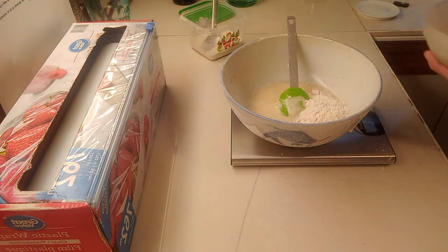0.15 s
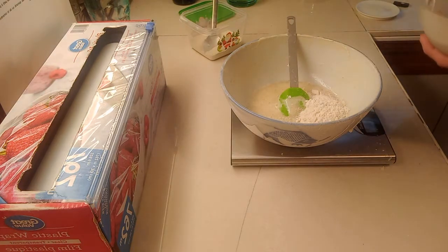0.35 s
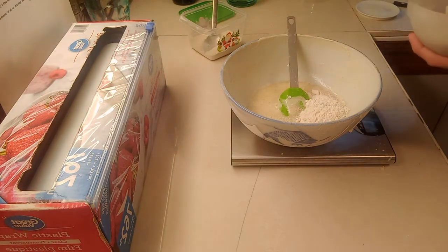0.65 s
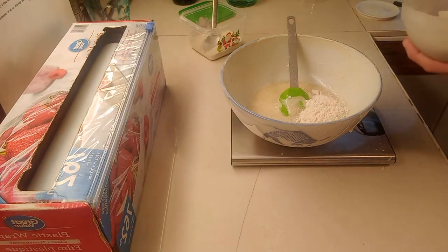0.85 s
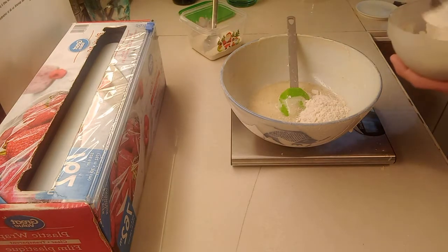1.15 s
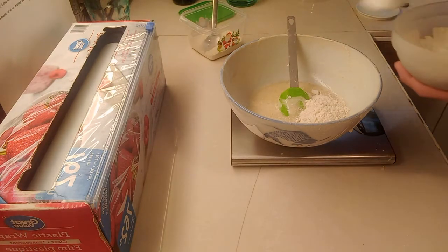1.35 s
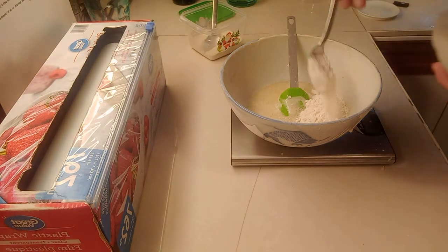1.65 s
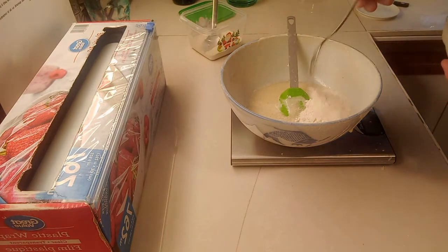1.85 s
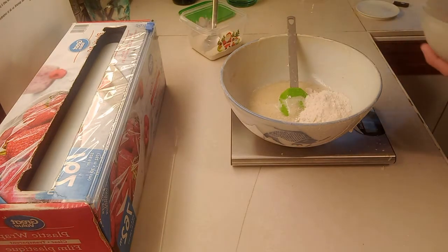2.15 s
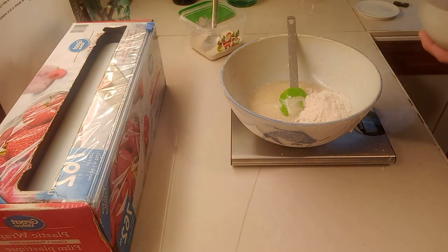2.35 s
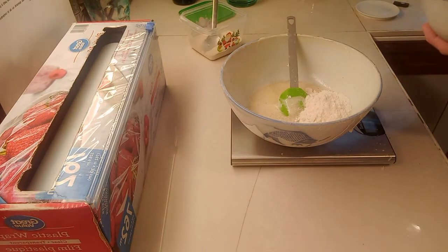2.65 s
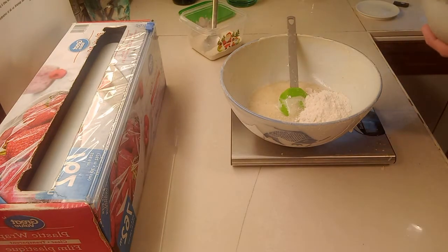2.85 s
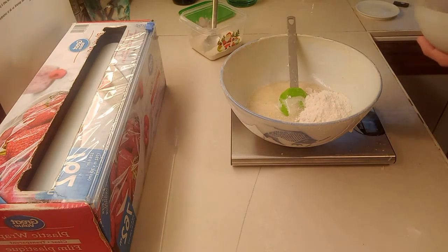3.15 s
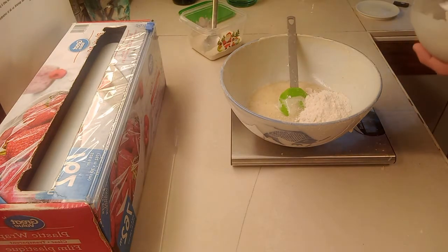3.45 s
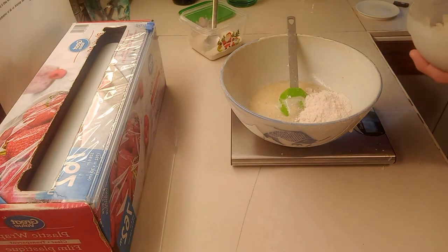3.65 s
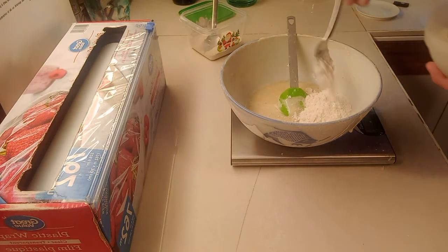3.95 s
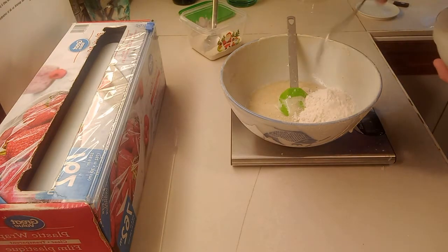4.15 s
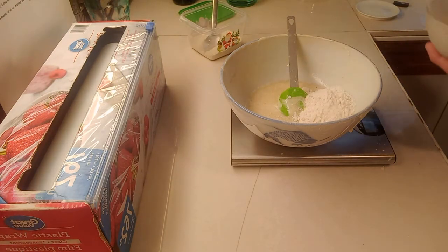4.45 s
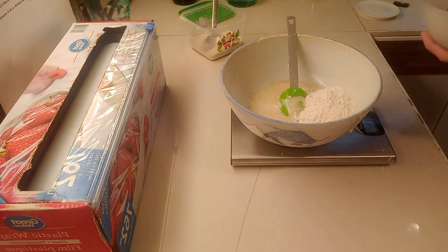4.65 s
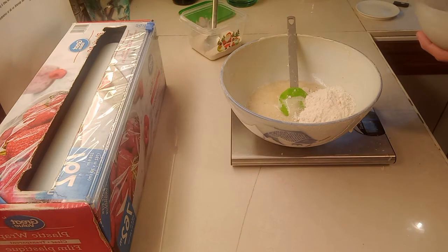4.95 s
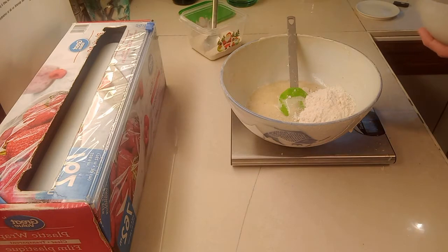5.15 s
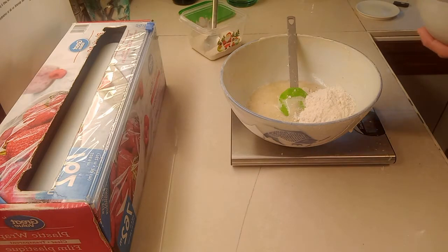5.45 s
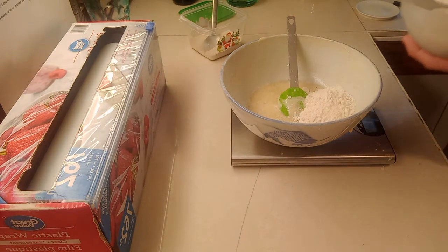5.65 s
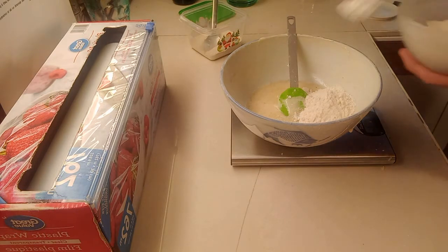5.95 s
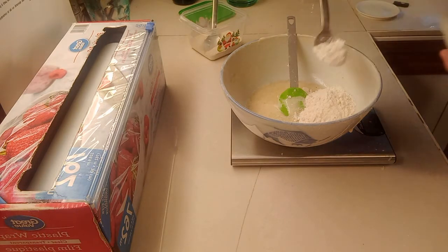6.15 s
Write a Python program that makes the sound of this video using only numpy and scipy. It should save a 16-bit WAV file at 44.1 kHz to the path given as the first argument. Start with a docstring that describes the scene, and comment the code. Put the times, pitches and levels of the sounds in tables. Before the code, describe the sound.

Heard fairly close in stereo, slightly to the right: a spoon scooping flour from a bowl in a small kitchen. First a bright ringing clink and a gritty crunch, then a quick double crunch followed by two hard knocks, and finally delicate ticks and a soft, dry scrape. Quiet low rumble and faint steady appliance tones fill the gaps.

```python
"""A metal spoon scoops flour three times from a hand-held bowl in a quiet kitchen.
Throughout, shaped noise gives a low rumble with one swell, faint hiss and narrow appliance tones.
Decaying rim modes make one bright clink near the start, with two far fainter touches later.
Random slips through resonances crunch in two deep scoops, then whisper in a last, lighter sweep.
Filtered clicks give ticks, thuds and knocks along the way, and dense reflections answer briefly."""
import sys
import numpy as np
from scipy import signal
from scipy.fft import rfft, irfft
from scipy.io import wavfile

SR = 44100
rng = np.random.default_rng(int(sys.argv[2]) if len(sys.argv) > 2 else 0)


def store_wav(level_fs):
    """Save 16-bit WAV to argv[1]."""
    pcm = np.round(np.clip(np.atleast_2d(level_fs), -1, 1) * 32767)
    wavfile.write(sys.argv[1], SR, pcm.T.astype(np.int16))


N = 278214  # length in samples
SIZE = 8192  # samples in a filter or a burst
HZ = np.fft.rfftfreq(SIZE, 1 / SR)


def amp(db):
    """Decibels to amplitude gain: twenty decibels are a factor of ten."""
    return 10 ** (np.asarray(db) / 20)


def unit(x):
    """Normalises the mean power, giving rms 1."""
    return x / np.sqrt(np.mean(x ** 2) + 1e-30)


def read(points, hz):
    """Interpolates a table linearly over the logarithm of frequency."""
    f, value = np.transpose(points)
    return np.interp(np.log(hz + 1), np.log(f + 1), value)


def add(mix, s, sound):
    """Superposition: adds a sound to the mix from time s in seconds."""
    part = mix[..., max(round(s * SR), 0):][..., :sound.shape[-1]]
    part += sound[..., :part.shape[-1]]


def humps(rows, hz):
    """Power sum of steep-sided resonances; each is 14 dB down one width from its centre."""
    power = 0
    for f, width, db in rows:
        gain = amp(db) / (1 + 0.72 * ((hz - f) / width) ** 2) ** 3
        power = power + gain ** 2
    return np.sqrt(power)


def colour(x, gain):
    """Minimum-phase filter: the Hilbert transform of the log gain on HZ supplies a causal phase."""
    both_halves = np.r_[gain, gain[-2:0:-1]]
    log_gain = np.log(np.maximum(both_halves / gain.max(), 1e-5))
    response = np.fft.ifft(np.exp(np.conj(signal.hilbert(log_gain)))).real
    return signal.fftconvolve(x, response)


def hiss(gain):
    """Random-phase noise: a fixed magnitude spectrum with uniformly random phases, at rms 1."""
    phases = np.exp(2j * np.pi * rng.random(len(gain)))
    return unit(irfft(gain * phases))


def contact(hz, bright_hz):
    """Contact softness as a second-order low-pass magnitude: a cushioned touch drives less treble."""
    return 1 / np.sqrt(1 + (hz / bright_hz) ** 4)


def reflections(x):
    """Diffuse reverberation: dense random reflections, different on each side, decay band by band."""
    # Each row: frequency in Hz, t60 in seconds
    decay_times = [(100, .3), (800, .25), (2300, 0.24), (5500, 0.18), (9000, .24), (15000, .25)]
    count = 1000  # time slots, the first six left empty
    taps = np.zeros((2, SR // 2))
    step = taps.shape[1] // count
    at = np.arange(6, count) * step + rng.integers(0, step, (2, count - 6))
    np.put_along_axis(taps, at, rng.choice([-1., 1.], at.shape), 1)
    hz, t, z = signal.stft(taps, SR, nperseg=256)
    fade = amp(-60 * t / read(decay_times, hz)[:, None])
    tail = signal.istft(z * fade, SR)[1]
    tail = tail / np.linalg.norm(tail[0])
    return signal.oaconvolve(x * np.ones((2, 1)), tail, axes=1)[:, :N]


def kitchen(x, wet_db, pan_db):
    """Localisation by time and level: direct sound reaches the right side first, then the room answers."""
    left_lag = 8  # samples
    sides = np.array([np.roll(x, left_lag), x])
    direct = sides * unit(amp([[pan_db], [0]]))
    return direct + amp(wet_db) * reflections(x)


def rumble_level():
    """Exponential envelope in decibels: a steady gain but for one swell that settles slowly."""
    steady_db, swell_db = -68, 7.5
    peak_s, rise_s, fall_s = 0.55, .45, 0.76
    t = np.arange(N) / SR - peak_s
    swell = np.exp(-np.maximum(-t / rise_s, t / fall_s))
    return amp(steady_db + swell_db * swell)


def appliance_tones(hz):
    """Narrow-band noise: random-phase bands sound as steady hum, whine and hiss."""
    # Each row: centre in Hz, width in Hz, rms level in dB
    bands = [(93, 4, -78.5), (393, 8, -87), (4756, 35, -88), (5080, 400, -95), (7600, 980, -95.5),
             (10030, 180, -100)]
    return sum(amp(db) * hiss(humps([(f, width, 0)], hz)) for f, width, db in bands)


def background(air_db):
    """Partial coherence: shared and independent noise form a rumble and faint hiss, under tones."""
    # Noise spectrum. Each row: frequency in Hz, relative level in dB per Hz
    air_spectrum = [(20, -45), (45, -14), (70, -0.5), (100, -2.5), (170, -9.5), (240, -13.5), (410, -9),
                    (520, -17.5), (800, -26), (1400, -36), (3500, -41.5), (5800, -43.5), (7500, -43.5),
                    (9000, -43), (15800, -45)]
    # Likeness of the two sides. Each row: frequency in Hz, left-right correlation from 0 to 1
    likeness = [(50, 0.5), (130, 0.95), (300, 0.3), (650, .35), (1400, 0), (16000, 0.06)]
    hz = np.fft.rfftfreq(N, 1 / SR)
    gain = amp(read(air_spectrum, hz))
    same = np.clip(read(likeness, hz), 0, 1)
    left, other = rfft(hiss(gain)), rfft(hiss(gain))
    right = same * left + np.sqrt(1 - same ** 2) * other
    both = np.array([left, right])
    low = contact(hz, 900)  # here a crossover between rumble and hiss
    rumble = irfft(both * low) * rumble_level() * amp([[-.7], [.7]])
    air = amp(air_db) * irfft(both * (1 - low))
    tones = np.array([appliance_tones(hz) for side in range(2)])
    return rumble + air + tones


def rattle(t60):
    """Spectral flattening: a dying burst of micro-contacts holds all frequencies evenly, with energy 1."""
    fade = amp(-60 * np.arange(SIZE) / SR / t60)
    burst = rng.standard_normal(SIZE) * fade
    # flattening smears the burst in time, so it alternates with fading
    for _ in range(3):
        flat = irfft(np.exp(1j * np.angle(rfft(burst))))
        burst = flat * np.sqrt(fade)
    return burst / np.linalg.norm(burst)


def blows(rows, body, chatter):
    """Source and filter: a sharp click and a dying chatter of the spoon excite a resonant body."""
    out = np.zeros(N)
    for s, db, bright_hz, t60 in rows:
        force = chatter * rattle(t60)
        force[0] += 1
        sound = colour(force, body * contact(HZ, bright_hz))
        add(out, s, amp(db) * sound / np.std(sound[:SR // 100]))  # level set over the first 10 ms
    return out


def ticks():
    """Impulse excitation: light touches of the spoon's tip are brief and rich in treble."""
    # Each row: start in seconds, level in dB before the room, brightness in Hz, chatter t60 in seconds
    touches = [(0.049, -65.5, 11900, 0.012), (2.833, -71.5, 14000, 0.069), (2.9142, -56, 11000, 0.043),
               (4.7195, -63.5, 22000, 0.03), (4.768, -68, 17000, 0.016), (4.809, -66.5, 15100, 0.035)]
    # Each row: frequency in Hz, relative level in dB
    spectrum = [(20, -38), (200, 9), (1100, -2), (1900, -11.5), (4100, -2.5), (5000, -12), (7200, -1),
                (8500, -8.5), (12000, -5.5), (15800, -2)]
    return blows(touches, amp(read(spectrum, HZ)), chatter=1.6)


def rim(clash_db, clash_t60, spoon_db, spoon_t60):
    """Modal superposition: close rim modes start in step and beat, under the spoon's clash and ring."""
    # Rim modes in beating clusters. Each row: frequency in Hz, relative level in dB,
    # t60 in seconds, left-right level difference in dB
    modes = [(888, -37, .21, 0), (907, -32, .23, 0), (2230, -40, .24, 0), (2269, -30, .26, 4),
             (2312, -39, .26, -2), (2438, -44, .19, 0), (4065, -32, .24, -2), (4103, -25, .05, -4),
             (4126, -25, .22, -4), (4243, -42, .2, 0), (6174, -40, .2, -3), (6232, -36, .27, -3),
             (6266, -39, .27, 0), (6325, -31, .13, -5), (6362, -35, .26, -3), (8822, -24.5, .065, 16),
             (8830, -44, .2, 10)]
    # Spoon on the free rim. Each row: start in seconds, strength in dB, favoured pitch in Hz,
    # spread around it in octaves, share of the clash in dB
    strikes = [(0.4125, 2.5, 4330, 3.4, 3.5), (0.934, -47, 4040, .35, -1), (4.722, -46, 4110, 0.54, -3.5)]
    # The spoon's own dense clash. Each row: frequency in Hz, relative level in dB
    clash_spectrum = [(20, -39), (90, -5.5), (400, -7), (900, -4), (1500, -4), (2500, 4.5), (3700, -2),
                      (4600, 6), (5400, -7.5), (6100, 4), (6800, -4), (7700, 3.5), (8300, -18.5),
                      (9000, -10), (10300, -25.5), (11300, -12), (12000, -1.5), (13200, -11.5), (13900, -3),
                      (15200, -22.5)]
    ring, clash = np.zeros((2, N)), np.zeros(N)
    t = np.arange(SR // 2) / SR
    # the rim's lobes swing against each other: the two sides hear them a quarter cycle apart
    sides = np.array([[-np.pi / 2], [0]])
    build = 1 - np.exp(-t / .002)
    clash_body = amp(read(clash_spectrum, HZ))
    for s, strength_db, centre_hz, octaves, share_db in strikes:
        # the struck spot favours modes near one pitch
        distance = np.log2((HZ + 1) / centre_hz) / octaves
        favour = np.exp(-distance ** 2 / 2)
        for hz, db, t60, pan_db in modes:
            mode = build * np.sin(2 * np.pi * hz * t + sides) * amp(-60 * t / t60)
            level = amp(strength_db + db) * np.interp(hz, HZ, favour)
            pan = amp([[pan_db / 2], [-pan_db / 2]])
            add(ring, s, level * pan * mode)
        # the spoon clashes, then rings on more softly
        stages = [(s, strength_db + clash_db, SR, clash_t60),
                  (s, strength_db + spoon_db, SR, spoon_t60)]
        clash += amp(share_db) * blows(stages, clash_body * favour, chatter=6)
    ring = ring + amp(-12) * reflections(ring)
    return ring + kitchen(clash, wet_db=2.0, pan_db=-7.0)


def thuds():
    """Damped impact: the spoon in the flour-filled bowl gives dull blows with little treble."""
    # Each row: start in seconds, level in dB before the room, brightness in Hz, chatter t60 in seconds
    impacts = [(0.4135, -50.5, 450, .08), (0.6742, -52, 1510, .02), (0.6802, -44.5, 1540, 0.018),
               (3.1385, -56.5, 550, 0.051), (4.769, -69.5, 2500, .03), (4.809, -67, 1477, 0.027)]
    # Each row: frequency in Hz, relative level in dB
    spectrum = [(20, -50), (100, -20), (200, -7), (330, 1), (600, -6), (1050, 1), (1600, -20), (4000, -40)]
    return blows(impacts, amp(read(spectrum, HZ)), chatter=0.84)


def stroke(t, swell, hold, release, touch_db, skid_db):
    """Stick-slip force: a light touch presses harder, breaks loose with a skid, drags on and lets go."""
    bite_s, skid_s = 0.0017, .005  # time to bite into the flour; length of the skid
    press_db = touch_db * np.maximum(1 - t / swell, 0)
    release_db = -60 * np.maximum(t - swell - hold, 0) / release
    skid = skid_db * np.exp(-((t - swell) / skid_s) ** 2) * (t > swell)
    return amp(press_db + release_db + skid) * (1 - np.exp(-t / bite_s))


def crunch(rows, resonances, slips_per_s, spread_db, touch_db, skid_db, grit_hz, grit_power):
    """Granular friction: countless tiny slips ring the spoon; gritty treble follows a power of the force."""
    out, t = np.zeros(N), np.arange(SR // 3) / SR
    low = contact(HZ, grit_hz) ** 2
    for s, swell, hold, release, db, pitch, grit_db in rows:
        slips = rng.standard_normal(len(t)) * (rng.random(len(t)) < slips_per_s / SR)
        slips *= amp(spread_db * np.minimum(rng.exponential(1, len(t)), 3))
        push = stroke(t, swell, hold, release, touch_db, skid_db)
        body = humps(resonances, HZ / pitch)
        smooth = colour(slips * push, body * low)
        grit = colour(slips * push ** grit_power, body * (1 - low))
        sound = smooth + amp(grit_db) * grit
        # the level is relative to the energy of the force
        add(out, s, amp(db) * sound * np.linalg.norm(push) / np.linalg.norm(sound))
    return out


def digs():
    """Granular friction under load: deep strokes ring the buried spoon, strongest near 1 kHz."""
    # Each row: start in seconds, swell in seconds, hold in seconds, release t60 in seconds,
    # level in dB before the room, factor on the resonances, grit in dB
    strokes = [(0.592, 0.062, 0.025, 0.036, -45.5, 1.035, -6),
               (2.9125, 0.0027, 0.0071, 0.15, -45.5, 0.996, -8),
               (2.972, 0.031, .028, 0.033, -47.5, 1.034, -2)]
    # Resonances of the buried spoon. Each row: centre in Hz, width in Hz, relative level in dB
    buried = [(1070, 250, -1.5), (1220, 148, 0), (1666, 156, -14), (2800, 1100, -12), (3190, 230, -1),
              (3910, 470, -10.5), (5050, 800, -23.5), (6090, 160, -13.5), (7080, 920, -16),
              (8700, 260, -18), (9330, 410, -24.5), (10840, 660, -25.5), (12300, 1400, -32),
              (14150, 170, -18), (14900, 480, -52)]
    return crunch(strokes, buried, slips_per_s=9000, spread_db=4.5, touch_db=-9.5, skid_db=3.5,
                  grit_hz=3440, grit_power=1.53)


def knocks():
    """Coupled resonance: knocks on the damped wall wake some of the rim, depending on where they land."""
    # Each row: start in seconds, level in dB before the room, brightness in Hz,
    # chatter t60 in seconds, share of the rim's ring in dB
    impacts = [(0.8607, -52, 1700, 0.022, -22), (0.8664, -60.5, 1420, 0.038, -20),
               (3.138, -38, 18000, 0.055, -1), (3.2687, -42, 10400, 0.026, 1.5),
               (5.2914, -56, 3500, 0.032, -8)]
    # Damped wall and spoon. Each row: centre in Hz, width in Hz, relative level in dB
    wall_resonances = [(604, 200, 2), (1120, 880, -1), (2040, 550, 0), (2410, 103, 8), (3740, 1300, -4),
                       (4060, 540, 2.5), (4960, 450, 2), (5470, 320, -10), (6100, 1100, -9),
                       (7300, 630, -4), (9360, 670, -11.5), (11330, 1060, -15.5), (12600, 1100, -14.5),
                       (14250, 650, -12)]
    # The rim's ring, choked by the spoon resting on it.
    # Each row: centre in Hz, width in Hz, relative level in dB
    choked = [(2290, 130, 0), (4110, 130, 1), (6350, 130, 13), (8800, 130, -5)]
    wall_gain, rim_gain = humps(wall_resonances, HZ), humps(choked, HZ)
    out = np.zeros(N)
    for *blow, ring_db in impacts:
        body = np.hypot(wall_gain, amp(ring_db) * rim_gain)
        out += blows([blow], body, chatter=3.2)
    return out


def sweeps():
    """Granular friction under light load: sparser slips along the wall ring a freer spoon."""
    # Each row: start in seconds, swell in seconds, hold in seconds, release t60 in seconds,
    # level in dB before the room, factor on the resonances, grit in dB
    strokes = [(4.918, .047, 0.0061, 0.11, -58.5, 0.97, -11), (5.046, 0.022, 0.0094, 0.1, -61.5, .98, -5.5),
               (5.083, .008, .002, 0.18, -66, 0.94, -10)]
    # Resonances of the sweeping spoon. Each row: centre in Hz, width in Hz, relative level in dB
    sliding = [(1172, 235, 0.5), (2110, 390, 0.5), (2380, 330, -5.5), (3260, 220, 0.5), (4510, 320, -2.5),
               (5670, 320, -7), (6170, 620, -6.5), (7540, 410, -1.5), (9200, 900, -13.5),
               (12500, 3100, -19), (15300, 1500, -25)]
    return crunch(strokes, sliding, slips_per_s=5600, spread_db=5.5, touch_db=-16.5, skid_db=7.5,
                  grit_hz=3020, grit_power=0.81)


def scene():
    """Superposition of spoon sounds, to the right of centre, on the kitchen's background."""
    mix = background(air_db=-63.0)
    mix = mix + kitchen(ticks(), wet_db=0.5, pan_db=-10.5)
    mix = mix + rim(clash_db=-34, clash_t60=.03, spoon_db=-41, spoon_t60=.15)
    mix = mix + kitchen(thuds(), wet_db=-6.5, pan_db=-9)
    mix = mix + kitchen(digs(), wet_db=-6, pan_db=-2.5)
    mix = mix + kitchen(knocks(), wet_db=1.5, pan_db=-7.5)
    return mix + kitchen(sweeps(), wet_db=-2.0, pan_db=-3.5)


def record(dry):
    """Band limitation: a linear-phase low-pass removes the highest treble."""
    edge_hz = 15820
    low_pass = signal.firwin(511, edge_hz, window=("kaiser", 9), fs=SR)
    return signal.oaconvolve(dry, low_pass[None], "same")


dry = scene()
out = record(dry)
store_wav(out)
```